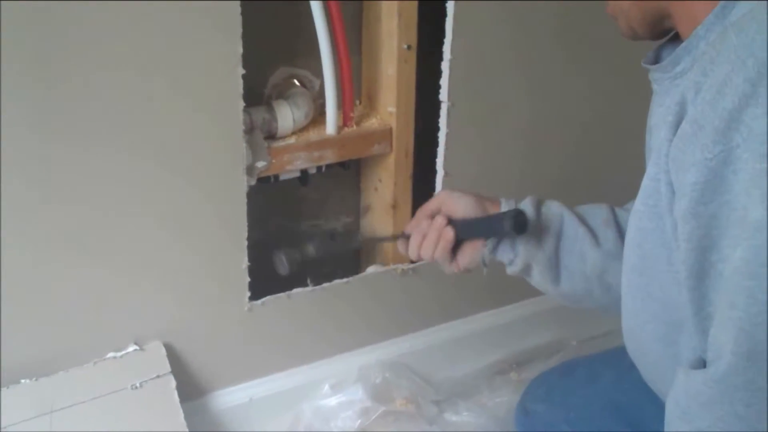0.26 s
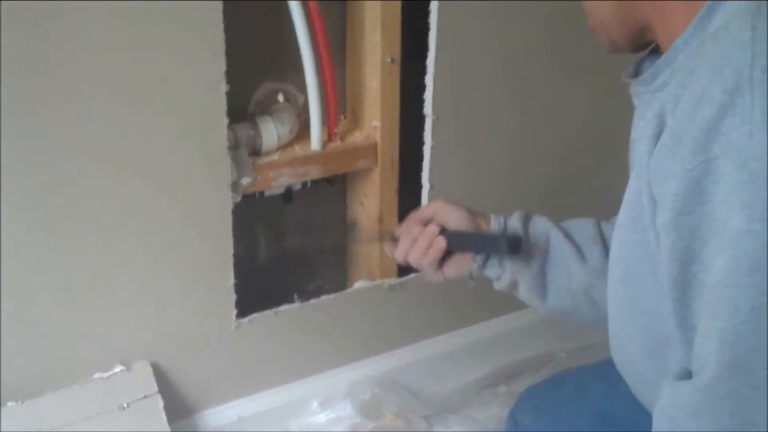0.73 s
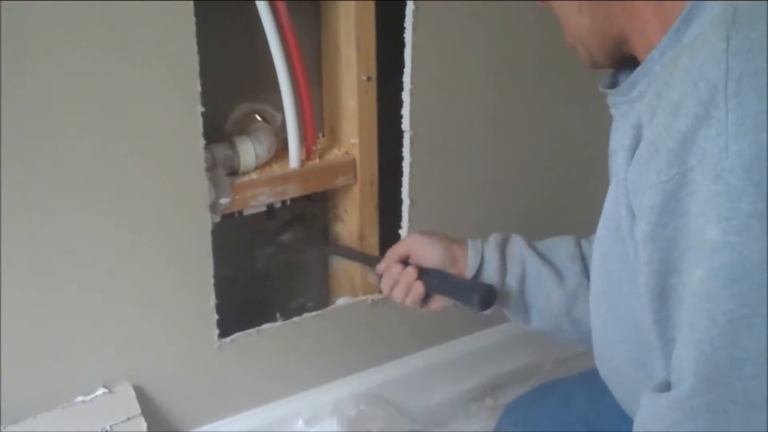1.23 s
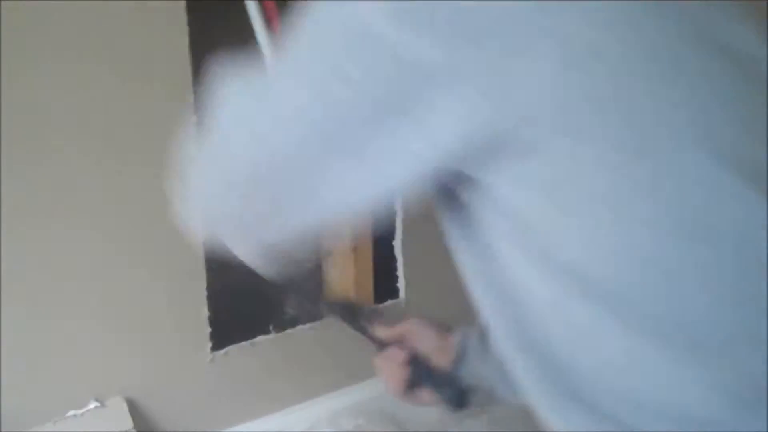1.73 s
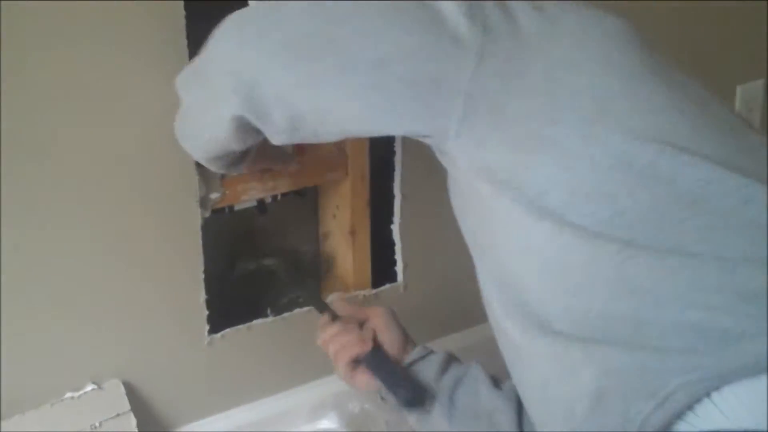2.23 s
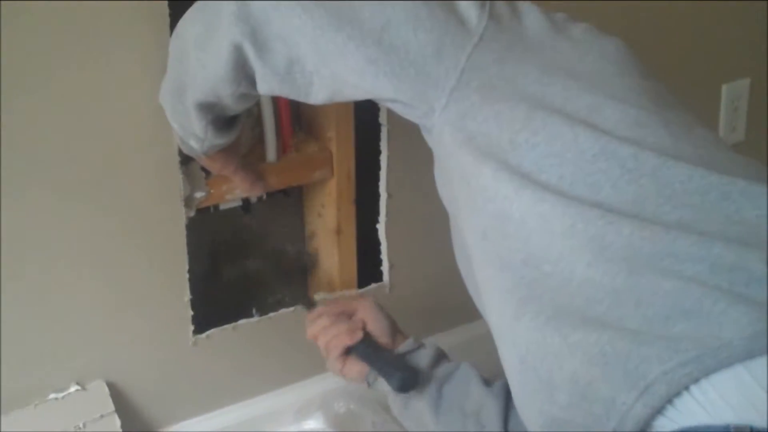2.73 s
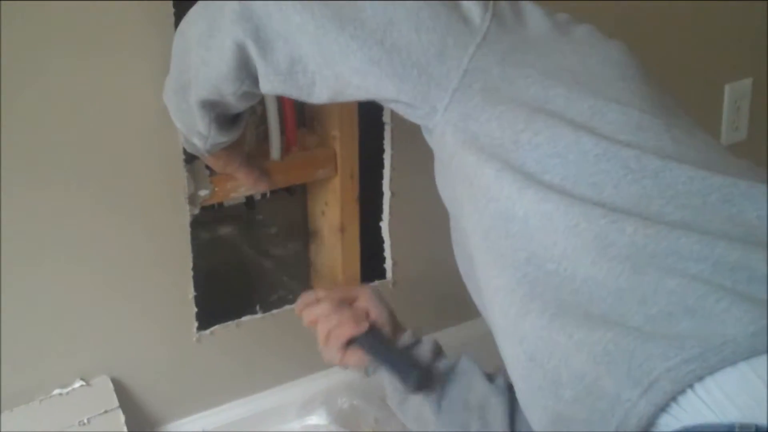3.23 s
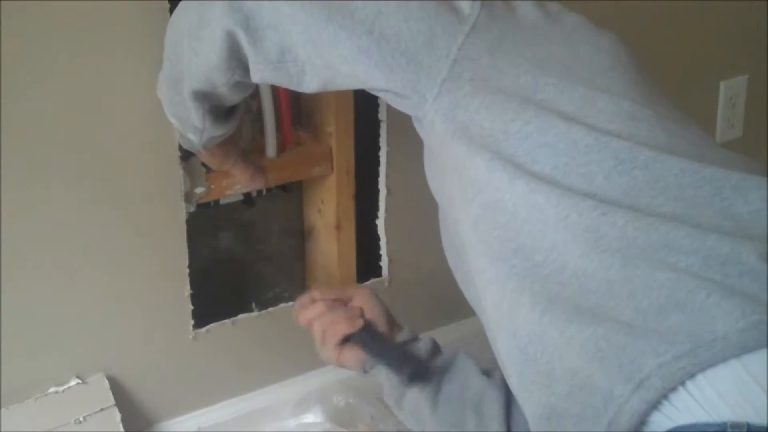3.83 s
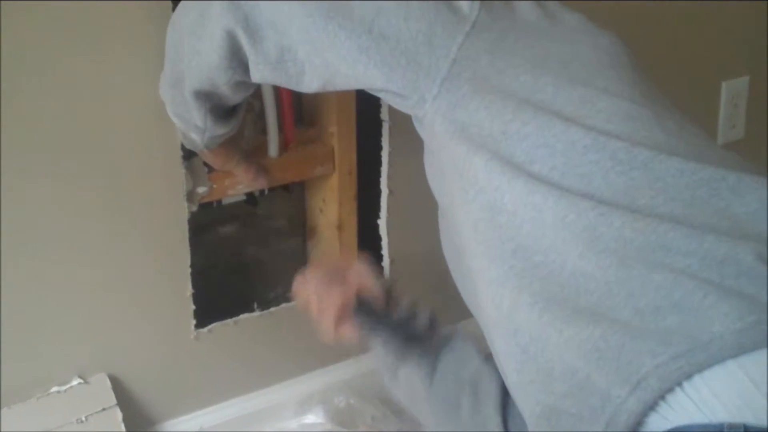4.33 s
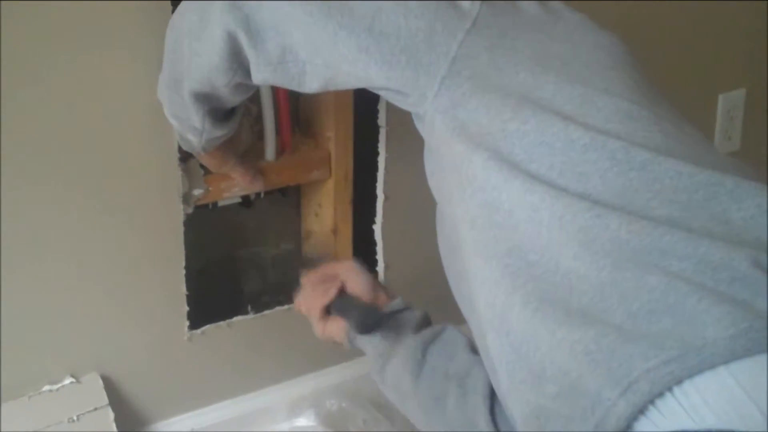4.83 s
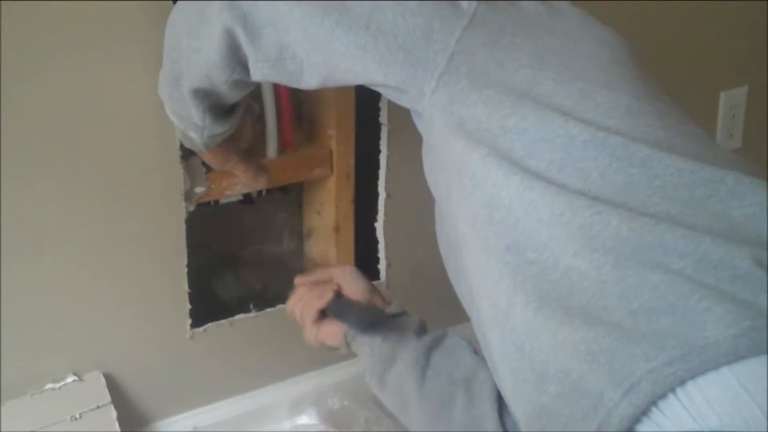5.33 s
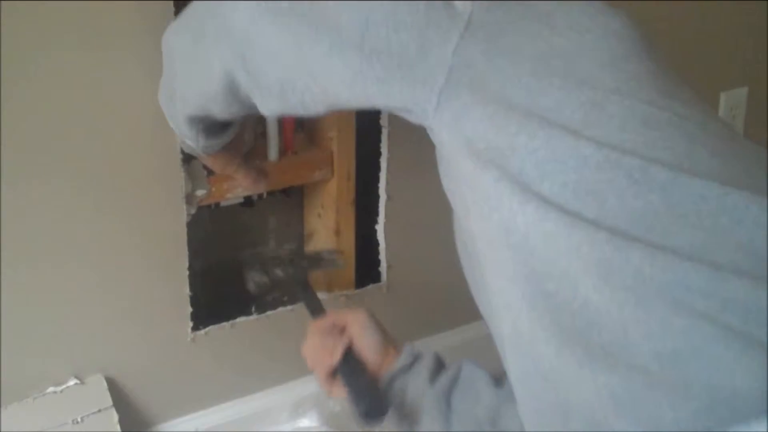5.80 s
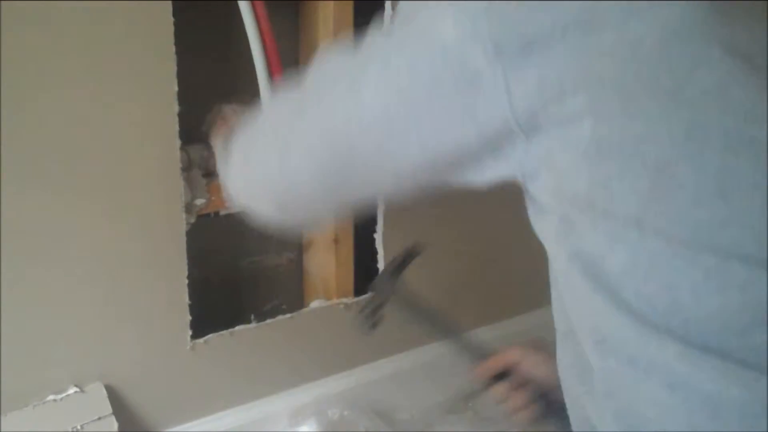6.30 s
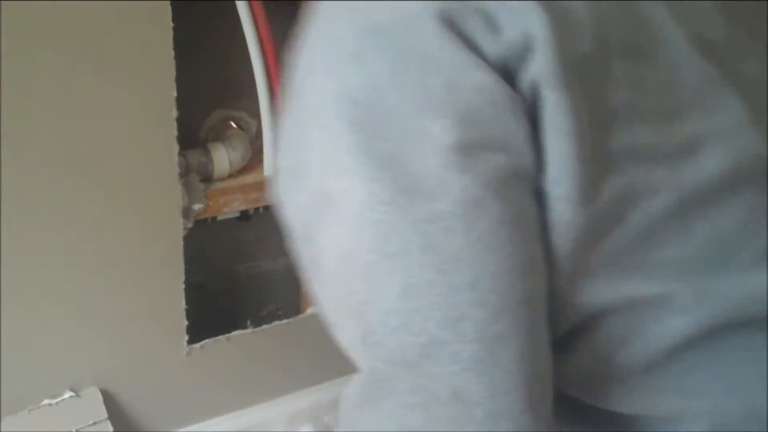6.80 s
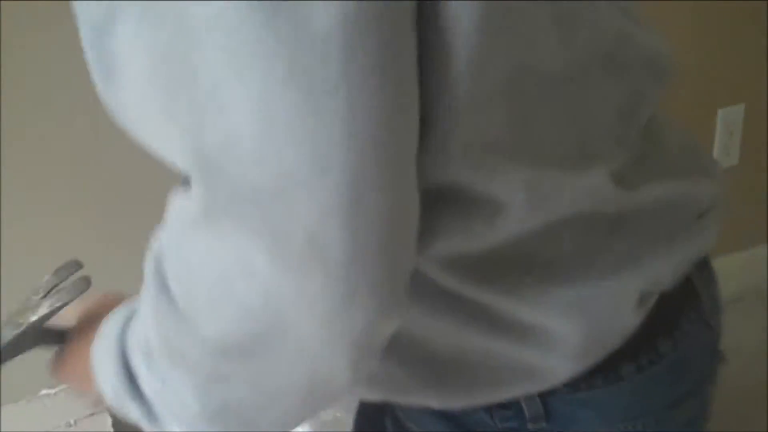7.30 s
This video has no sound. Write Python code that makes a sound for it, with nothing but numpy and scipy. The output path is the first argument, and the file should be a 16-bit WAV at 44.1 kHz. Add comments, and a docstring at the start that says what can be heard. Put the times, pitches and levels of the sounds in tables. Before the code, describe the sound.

A hammer strikes a nail in wall framing: three bright, clinking blows, cloth rustle and soft bumps, then eleven heavier, booming knocks in a bare room.

```python
"""Hammering a nail into a framed wall

A steel hammer drives a nail in a bare room: three bright blows, then a run of eleven heavier ones.
Each blow sums a steel crack, damped wall modes, rattling fittings and diffuse echoes, all shaped noise or sines.
Heavy blows sound duller, glancing ones brighter; a few cracks are rebounds of the hammer head.
Between and after the runs a sweatshirt rubs past the microphone as speed-driven noise.
Soft bumps against floor and wall, tiny clicks and a faint room noise complete the scene."""
import sys
import numpy as np
from scipy import signal
from scipy.fft import rfft, irfft, next_fast_len
from scipy.io import wavfile
from scipy.ndimage import map_coordinates

SR = 44100
rng = np.random.default_rng(int(sys.argv[2]) if len(sys.argv) > 2 else 0)


def bounce(signal):
    """Save signal as a 16-bit WAV file at the path given by the first command-line argument."""
    frames = np.transpose(np.atleast_2d(signal))
    limited = np.clip(frames, -1, 1)
    pcm = np.round(limited * 32767).astype(np.int16)
    wavfile.write(sys.argv[1], SR, pcm)


N = 332955
TOP_HZ = 10580  # upper band limit
RING = int(.8 * SR)  # samples in the response to one hit
AGE = np.arange(RING) / SR  # seconds since the hit
GRID = np.fft.rfftfreq(2 * RING, 1 / SR)  # frequencies (Hz) on which hit spectra are given

# left-right correlation of diffuse sound: freq_hz, likeness (0 to 1)
DIFFUSE_LIKENESS = [(200, .99), (550, .95), (1400, .72), (3200, .4), (6500, .07)]
# left-right correlation of the direct sound of a hit: freq_hz, likeness (0 to 1)
DIRECT_LIKENESS = [(200, .99), (550, .96), (1400, .8), (3200, .8), (7000, .66)]


def amp(db):
    """Level to gain: 20 dB is a factor of ten in amplitude."""
    return 10 ** (np.asarray(db) / 20)


def unit(x):
    """Normalise the root-mean-square amplitude to 1."""
    return x / np.sqrt(np.mean(x ** 2) + 1e-20)


def along(points, hz):
    """Interpolate (Hz, value) points on a logarithmic frequency axis, near the ear's pitch scale."""
    f, v = np.transpose(points)
    return np.interp(np.log(hz + 1), np.log(f + 1), v)


def fade(t, t60):
    """Exponential energy loss: the level falls 60 dB in t60 seconds."""
    return amp(-60 * t / t60)


def rise(time_constant_s):
    """Exponential build-up of a response after the hit."""
    return 1 - np.exp(-AGE / time_constant_s)


def hump(hz, width_hz):
    """Resonance curve on GRID: a bell of height 1 at its centre, half that at half its width away."""
    return 1 / (1 + (2 * (GRID - hz) / width_hz) ** 2)


def wobble(rate):
    """Band-limited random fluctuation: a smooth curve through `rate` random knots a second."""
    knots = rng.standard_normal(int(N * rate / SR) + 4)
    return map_coordinates(knots, [np.arange(N) * rate / SR])


def filtered(x, gain):
    """Linear zero-phase filtering: multiply the spectrum by a gain of frequency."""
    n = x.shape[-1]
    m = next_fast_len(n + 4096)
    return irfft(rfft(x, m) * gain(np.fft.rfftfreq(m, 1 / SR)), m)[..., :n]


def coloured(x, gain):
    """Minimum-phase filtering of one hit: folding the cepstrum keeps the response causal."""
    cepstrum = irfft(np.log(np.maximum(gain, 1e-6)))
    cepstrum[1:RING] *= 2
    cepstrum[RING + 1:] = 0
    response = np.exp(rfft(cepstrum))
    return irfft(rfft(x, 2 * RING) * response)[..., :RING]


def band_norm(gain, lo_hz, hi_hz):
    """Power normalisation: unit white noise through the gain has rms 1 from the band's part."""
    in_band = (GRID > lo_hz) & (GRID < hi_hz)
    return gain / np.sqrt(np.mean(gain ** 2 * in_band))


def pair(n, likeness):
    """Spatial coherence: mixing mid and side noise sets the correlation of the two microphone ports."""
    def mid_side_gain(hz):
        angle = np.arccos(np.clip(along(likeness, hz), -1, 1)) / 2
        return np.array([np.cos(angle), np.sin(angle)])

    mid, side = filtered(rng.standard_normal((2, n)), mid_side_gain)
    return np.array([mid + side, mid - side])


def ring(modes, scatter_db, detune):
    """Modal superposition: damped sines, each varied a little in level and pitch from hit to hit."""
    hz, db, t60 = np.transpose(modes)[:, :, None]
    size, shift, phase = rng.standard_normal((3, len(modes), 1))
    cycles = hz * (1 + detune * shift) * AGE + phase
    envelopes = amp(db + scatter_db * size) * fade(AGE, t60)
    return np.sum(envelopes * np.sin(2 * np.pi * cycles), axis=0)


def add(track, s, sound):
    """Linear superposition: mix a sound in at time s, cut at the ends of the track."""
    start = round(s * SR)
    part = sound[:, max(-start, 0):max(N - start, 0)]
    track[:, max(start, 0):][:, :part.shape[1]] += part


def room_tail():
    """Diffuse reverberation: noise whose deepest bass dies first, while notes near 210 Hz linger longest."""
    # reverberation time: freq_hz, t60_s
    reverb_times = [(80, 0.18), (210, 0.68), (560, 0.46), (1500, 0.58), (3000, 0.46), (4500, 0.47),
                    (7000, 0.4), (10500, 0.35)]
    hz, t, spectrum = signal.stft(pair(RING, DIFFUSE_LIKENESS), SR, nperseg=256)
    decay = fade(t, along(reverb_times, hz)[:, None])
    return signal.istft(spectrum * decay, SR, nperseg=256)[1][:, :RING]


def crack(pitch_hz, edge_db):
    """Impact excitation: steel on the nail gives a brief bright burst; a glancing contact lifts its treble."""
    shape_db = along([(300, -9.5), (1500, -0.5), (2600, 5.5), (4500, 5.5), (7000, -2.0), (10000, -10.5)], GRID)
    shape = band_norm(amp(shape_db + 8 * hump(pitch_hz, 600)), 1500, TOP_HZ)
    glance = amp(max(edge_db, 0) * hump(6600, 1300))
    burst = pair(RING, DIRECT_LIKENESS) * fade(AGE, .028) * rise(.0003)
    return coloured(burst, shape * glance) * amp([[.5], [-.5]])  # dB, left and right


def ping(pitch_hz, edge_db):
    """Modal ringing of the nail for a few milliseconds; the upper of two modes grows with the treble."""
    t60 = .02
    modes = [(pitch_hz, 1.5, t60), (6600, -10.5 + edge_db, t60)]
    return ring(modes, scatter_db=2, detune=.005) * rise(0.00046)


def slap(wood, slap_db, t60=0.06):
    """Early reflection: cavity and plasterboard throw the crack back within a few milliseconds."""
    burst = pair(RING, DIFFUSE_LIKENESS) * fade(AGE, t60) * (1 - np.exp(-(AGE / 0.0033) ** 2))
    tone_db = along([(150, -14.5), (500, -9), (1300, 3.5), (3500, 3), (7000, -6.5)], GRID)
    return amp(slap_db) * coloured(burst, wood * amp(tone_db))


def steel_ring():
    """Free vibration of the hammer: slowly damped modes woken by the crack."""
    # after-ring of the hammer: freq_hz, level_db, t60_s
    hammer_modes = [(1320, -43.5, 0.55), (2540, -45, .42), (3250, -46, 0.43), (4500, -54.5, .28)]
    return ring(hammer_modes, scatter_db=4.0, detune=.002)


def wood_gain():
    """Resonant transmission: peaks of stud, nail and hammer head on the broad spectrum of a blow."""
    # broad colour of a blow: freq_hz, density_db (per Hz)
    broad_colour = [(30, -29), (60, -8.5), (150, -1.5), (330, 0.5), (600, 7.5), (900, -0.5), (1500, -4.5),
                    (2200, -7), (3300, -7), (4400, -15.5), (5300, -15.5), (7000, -14), (8500, -17.5),
                    (10500, -24.5)]
    # resonances of stud, nail and hammer head: freq_hz, width_hz, lift_db
    resonances = [(335, 34, 7.5), (520, 35, 2.5), (680, 25, 5.5), (834, 75, 4), (1036, 35, 6),
                  (1150, 17, 4.5), (1340, 40, 4), (1493, 9.3, 3), (1708, 93, 8), (1890, 66, 5.5),
                  (2080, 28, 4), (2345, 97, 7), (2390, 35, 5.5), (2580, 43, 6.5), (3012, 110, 6.5),
                  (3345, 9.7, 3.5), (3680, 18, 8), (4310, 730, 9), (4870, 200, 3), (5950, 830, 2),
                  (7500, 640, 0.5)]
    wood_db = along(broad_colour, GRID) + sum(lift * hump(hz, width) for hz, width, lift in resonances)
    return band_norm(amp(wood_db), 280, 2200)


def frame_boom():
    """Bending modes of the framed wall: low resonances that ring down together."""
    # low modes of the wall: freq_hz, level_db
    wall_modes = [(51, -17.5), (76, -14), (88, -10), (136, -1), (147, -9.5), (193, -9.5), (218, -1.5),
                  (227, 2.5), (250, 1), (323, -8), (462, -7), (682, -7), (829, -3), (1149, -9.5),
                  (1353, -14.5), (1762, -13)]
    t60 = .43
    modes = [(hz, level_db, t60) for hz, level_db in wall_modes]
    return amp(-5.0) * ring(modes, scatter_db=3, detune=0.006) * rise(0.013)


def rattle(rattle_db, count=4):
    """Secondary impacts: loose fittings jump and land again some tens of milliseconds after the blow."""
    delays, sizes_db = rng.uniform(.01, .08, count), rng.normal(0, 3, count)
    envelope = np.zeros(RING)
    for s, db in zip(delays, sizes_db):
        # later landings tend to be weaker
        envelope += amp(db) * fade(s, .4) * fade(np.abs(AGE - s), .022) * (AGE > s)
    return amp(rattle_db) * envelope * pair(RING, DIRECT_LIKENESS)


def shove(boom_db, shove_db=-7, t60=0.26):
    """Whole-panel flexure: a short, deep thud whose level grows by 2 dB per dB of boom."""
    shape_db = along([(25, -26), (38, -18.5), (52, -11.5), (130, 4), (220, 1.5), (450, -13.5),
                      (1000, -28.5), (3000, -65.0)], GRID)
    push = pair(RING, DIFFUSE_LIKENESS) * fade(AGE, t60) * rise(0.039)
    return amp(shove_db + 2.0 * boom_db) * coloured(push, band_norm(amp(shape_db), 0, TOP_HZ))


def contact(rule, db, crack_db):
    """Contact law: the lift of one register in dB follows how heavy and how glancing the blow is."""
    usual_level_db, usual_crack_db = -24, 14  # an ordinary blow
    usual, per_level, per_crack = rule
    return usual + per_level * (db - usual_level_db) + per_crack * (crack_db - usual_crack_db)


def hammer(steady=0.55, flutter_db=0.24):
    """Impact response: each blow sums crack, short knock of the stud, boom of the wall and the room's answer."""
    # blows, the first only still ringing: start_s, level_db, crack_db (steel), boom_db (wall), pitch_hz (crack)
    blows = [(-.22, -27.5, 29, 2, 4200), (0.143, -28.5, 22.5, 2, 3160), (0.5081, -31, 22, 2, 4210),
             (0.8736, -33, 19.5, 0, 3000), (2.688, -19.5, 15.5, 11.5, 4124), (2.9879, -14.5, 14, 6, 2290),
             (3.285, -16, 13, 3, 4160), (3.568, -22.5, 17.5, 5.5, 4470), (3.8495, -23.5, 17.5, 3, 4210),
             (4.122, -24.5, 16, -3.5, 2400), (4.407, -26, 12.5, 2.5, 4300), (4.7162, -25.5, 9, 2.5, 4110),
             (4.9993, -23, 11, -0.5, 4400), (5.2893, -21, 11.5, -6, 4140), (5.5827, -24, 14, -4.5, 4060)]
    # contact tone of the wall's hollow note, upper mids and treble:
    # usual_db, slope_db (per dB of extra level), slope_db (per dB of extra crack)
    body_rule = (.7, 0.11, -0.31)
    bite_rule = (2.2, -.3, .07)
    edge_rule = (-0.28, -0.21, 0.81)
    out = np.zeros((2, N))
    wood = wood_gain()
    # part of the echo power is alike for all blows, part moves with the worker
    fixed_tail, share = room_tail(), np.clip(steady, 0, 1)
    clumps = amp(flutter_db * wobble(220))  # echoes arrive in clusters
    for s, db, crack_db, boom_db, pitch_hz in blows:
        body_db, bite_db, edge_db = [contact(rule, db, crack_db) for rule in (body_rule, bite_rule, edge_rule)]
        knock = amp(10.5) * pair(RING, DIRECT_LIKENESS) * fade(AGE, 0.2) * rise(0.014)
        tail = np.sqrt(share) * fixed_tail + np.sqrt(1 - share) * room_tail()
        tail = tail * np.roll(clumps, -round(s * SR))[:RING]
        echoes = amp(1.0) * tail * rise(0.0097)
        wall = coloured(knock + echoes + rattle(rattle_db=-3.0), wood) + frame_boom()
        # a hard, glancing contact is bright; a square one pushes the whole wall
        contact_db = along([(140, .6 * boom_db), (220, body_db), (350, 0), (1700, 0),
                            (3000, bite_db), (4500, bite_db), (6200, edge_db)], GRID)
        steel = amp(-0.97) * crack(pitch_hz, edge_db) + ping(pitch_hz, edge_db)
        steel = steel + slap(wood, slap_db=-4.0) + steel_ring()
        blow = coloured(wall, amp(contact_db)) + shove(boom_db) + amp(crack_db) * steel
        add(out, s, amp(db) * blow)
    return out


def still_room(floor_db=-73):
    """Stationary background noise: faint rumble and hiss of the house with a fixed spectrum."""
    # spectrum of the still room: freq_hz, density_db (per Hz)
    quiet = [(20, -9.5), (35, -4.5), (60, -12.5), (100, -18), (370, -25.5), (800, -32.5), (3150, -19.5),
             (10500, -31)]
    noise = filtered(pair(N, DIFFUSE_LIKENESS), lambda hz: amp(along(quiet, hz)))
    return amp(floor_db) * unit(noise)


def bumps():
    """Soft impacts: compliant contact gives dull knocks that die in the room; harder ones add a woody clack."""
    # soft bumps of tool and body: start_s, level_db, centre_hz, clack_db (woody part)
    soft_bumps = [(0.764, -45, 375, -11), (1.405, -33.5, 290, -15), (1.8, -30, 140, -24),
                  (1.825, -34.5, 340, -26), (1.844, -30.5, 70, -29), (1.983, -35, 300, -22.5),
                  (2.041, -33.5, 70, -35), (2.079, -30.5, 230, -17), (6.521, -63, 55, -32.5),
                  (7.43, -33.5, 310, -3), (7.462, -40, 162, -13), (7.532, -36, 330, -5)]
    out = np.zeros((2, N))
    softness = amp(along([(1000, 3.5), (2000, -4.5), (5000, -3), (10000, -11.0)], GRID))
    octaves_off = np.log2((GRID + 1) / 740)  # from the clack's centre in Hz
    clack = 1 / (1 + (octaves_off / 0.97) ** 2) ** 1.03
    for s, db, hz, clack_db in soft_bumps:
        shape = softness * (hump(hz, width_hz=170) + amp(clack_db) * clack)
        thud = pair(RING, DIFFUSE_LIKENESS) * fade(AGE, t60=0.53) * rise(0.0016)
        add(out, s, amp(db) * coloured(thud, band_norm(shape, 0, TOP_HZ)))
    return out


def snags(rate, snag_db):
    """Stick-slip friction: fibres now and then catch and let go, each a jump in gain that decays."""
    catches = (rng.random(N) < rate / SR) * rng.random(N)
    return 1 + amp(snag_db) * signal.fftconvolve(catches, fade(AGE, .015))[:N]


def sleeve():
    """Friction noise: grainy rubbing of cloth, louder and brighter as each stroke speeds up."""
    # strokes of the sleeve: start_s, fastest_s, end_s, level_db
    strokes = [(1.43, 1.742, 2.02, -44), (1.73, 2.015, 2.254, -36), (2.05, 2.267, 2.448, -47),
               (2.2, 2.467, 6.2, -56), (6.22, 6.281, 6.8, -65.5), (6.295, 6.53, 6.64, -59),
               (6.475, 6.738, 7.22, -59), (6.887, 7.038, 7.39, -53), (7.285, 7.459, 7.86, -52)]
    # spectrum of the cloth: freq_hz, density_db (per Hz)
    cloth_colour = [(25, -13), (55, 0.5), (100, -4), (200, -4.5), (414, -5), (700, -5), (1390, -4.5),
                    (2090, -6.5), (4040, -4), (6500, -8), (9000, -12.5), (10500, -19)]
    speed_power = 0.93  # the rub grows as this power of the sleeve's speed
    hiss_db, rub_db = 6, -50.5  # gain of the hiss over a rub of level rub_db
    hiss_growth = 0.2  # extra dB of hiss per dB of rub
    t = np.arange(N) / SR
    cloth = amp(along(cloth_colour, GRID))
    low_share = 1 / (1 + (GRID / 2200) ** 6)  # power share of the rub; the hiss has the rest
    rub_gain = band_norm(cloth * np.sqrt(low_share), 500, TOP_HZ)
    hiss_gain = band_norm(cloth * np.sqrt(1 - low_share), 500, TOP_HZ)
    grain = unit(amp(0.58 * wobble(380) + 1.2 * wobble(39)) * snags(rate=33, snag_db=1))
    rub = filtered(grain * pair(N, DIFFUSE_LIKENESS), lambda hz: np.interp(hz, GRID, rub_gain))
    hiss = filtered(grain * pair(N, DIFFUSE_LIKENESS), lambda hz: np.interp(hz, GRID, hiss_gain))
    levels = []
    for start, fastest, end, db in strokes:
        speed = np.interp(t, [start, fastest, end], [0, 1, 0])
        levels.append(amp(db) * speed ** speed_power)
    level = np.linalg.norm(levels, axis=0)  # overlapping strokes add in power
    return level * (rub + amp(hiss_db) * (level / amp(rub_db)) ** hiss_growth * hiss)


def rebounds():
    """Elastic recoil: the head bounces back on to the nail, a lone crack with no boom."""
    # rebounds of the hammer head: start_s, level_db, pitch_hz (crack)
    bounces = [(3.0325, -15, 4200), (3.3234, -11, 4400), (4.1685, -25, 4200)]
    out = np.zeros((2, N))
    for s, db, pitch_hz in bounces:
        add(out, s, amp(db) * crack(pitch_hz, edge_db=0))
    return out


def ticks():
    """Brief hard contacts: short wide-band bursts, each with a faint echo."""
    # small clicks of grit and tool: start_s, level_db (before the tone filter)
    clicks = [(5.9637, -54.5), (6.085, -55), (6.494, -48), (7.0504, -44), (7.2466, -46.5), (7.307, -42.5),
              (7.4287, -26)]
    out = np.zeros((2, N))
    for s, db in clicks:
        click = pair(RING, DIRECT_LIKENESS) * fade(AGE, 0.049)
        add(out, s, amp(db) * (click + amp(-11) * room_tail()))
    tone = [(200, -25.0), (1200, -4.5), (5000, -1.5), (10000, -7.0)]
    return filtered(out, lambda hz: amp(along(tone, hz)))


def scene():
    """Stereo level difference: the work at the wall lies slightly to the left."""
    work = hammer() + rebounds() + bumps() + ticks()
    return work * amp([[.5], [-.5]]) + sleeve() + still_room()


def record(dry, top=0.98, hardness=6):
    """Saturation and band limit: the microphone rounds off the loudest peaks and cuts steeply above TOP_HZ."""
    squashed = dry / (1 + np.abs(dry / top) ** hardness) ** (1 / hardness)
    return filtered(squashed, lambda hz: 1 / np.sqrt(1 + (hz / TOP_HZ) ** 120))


dry = scene()
out = record(dry)
bounce(out)
```